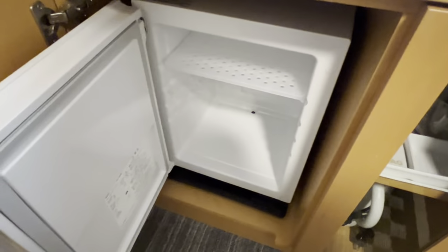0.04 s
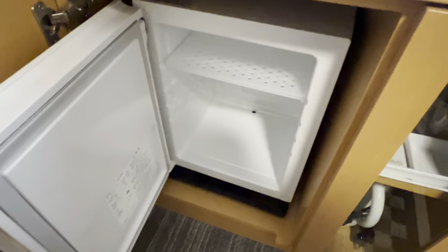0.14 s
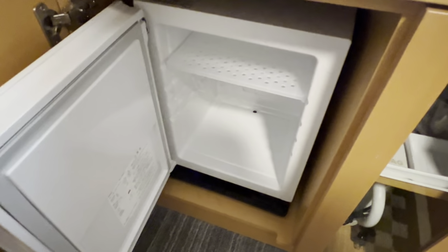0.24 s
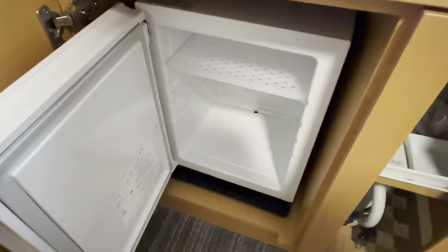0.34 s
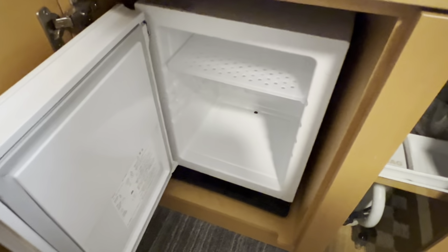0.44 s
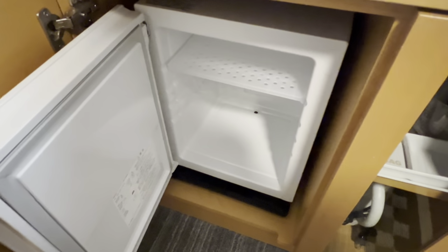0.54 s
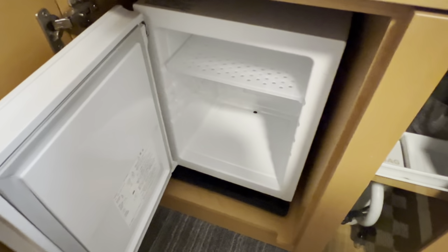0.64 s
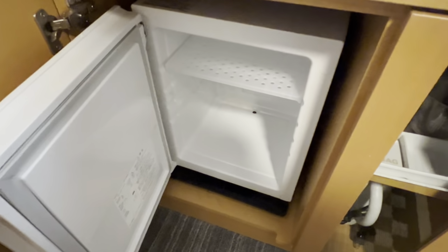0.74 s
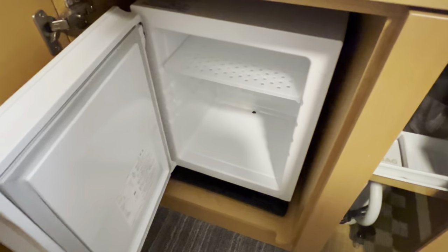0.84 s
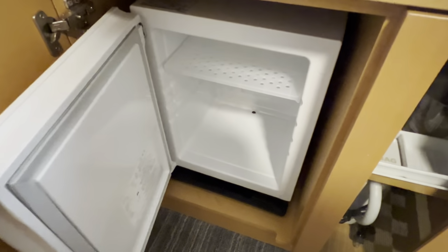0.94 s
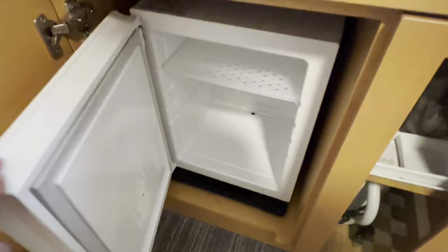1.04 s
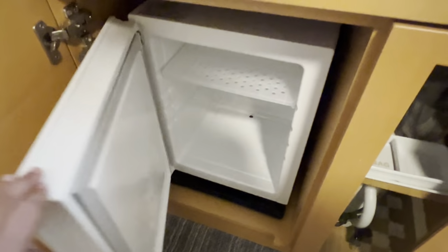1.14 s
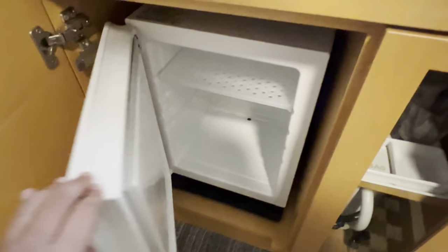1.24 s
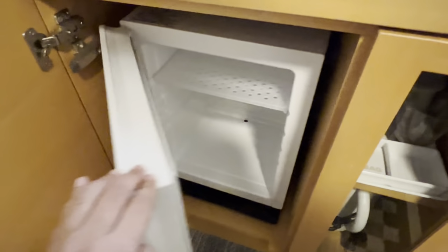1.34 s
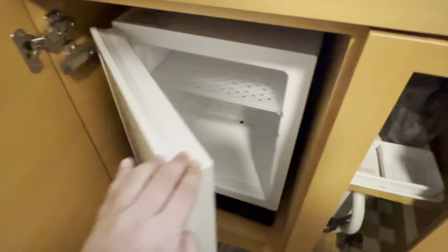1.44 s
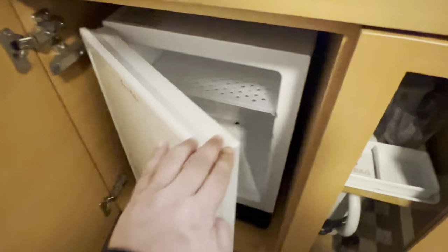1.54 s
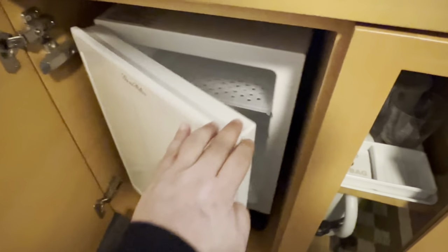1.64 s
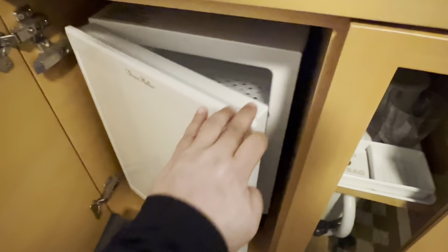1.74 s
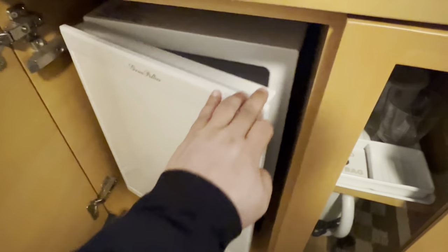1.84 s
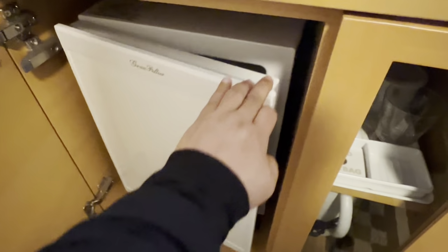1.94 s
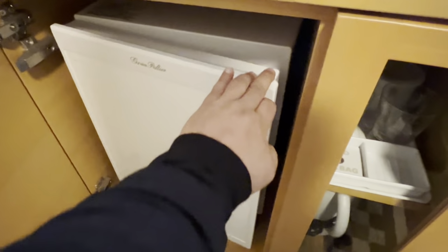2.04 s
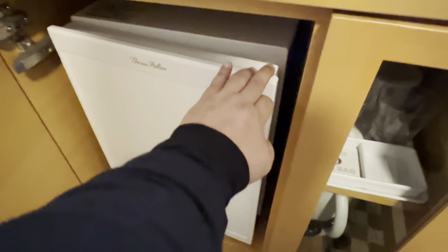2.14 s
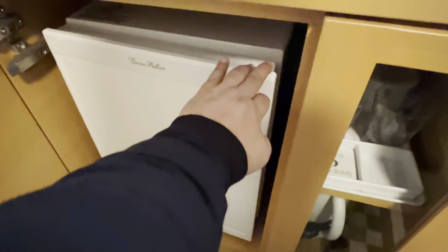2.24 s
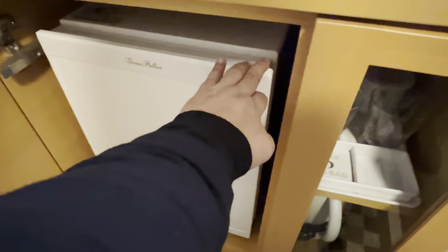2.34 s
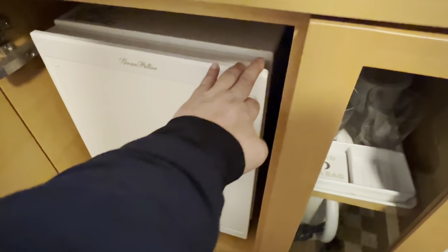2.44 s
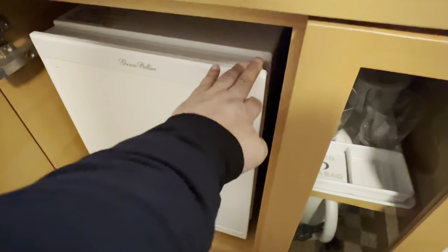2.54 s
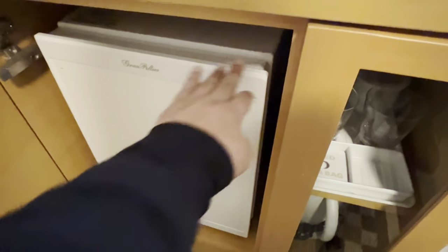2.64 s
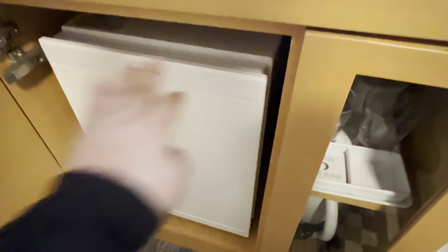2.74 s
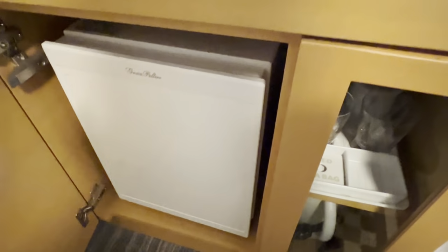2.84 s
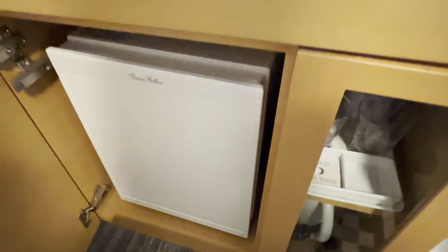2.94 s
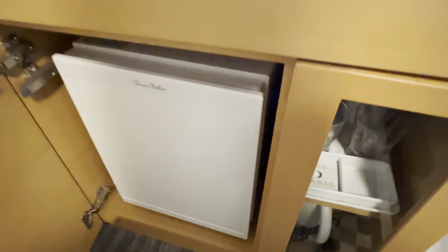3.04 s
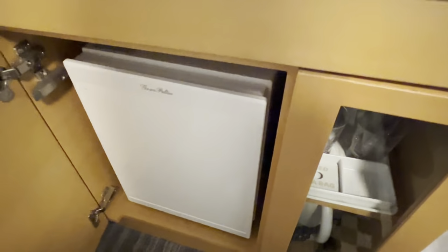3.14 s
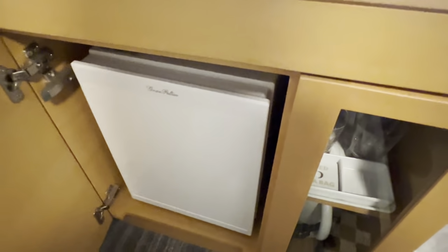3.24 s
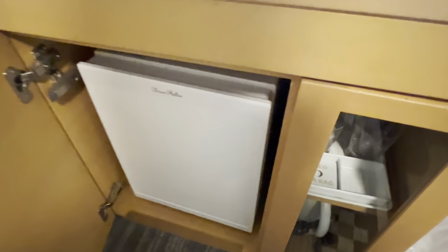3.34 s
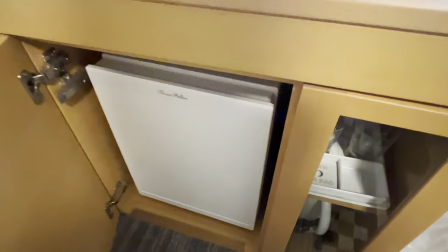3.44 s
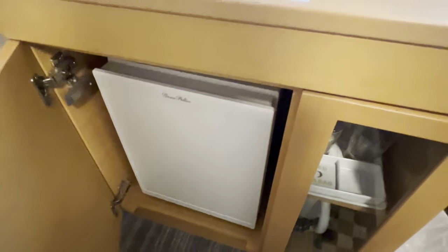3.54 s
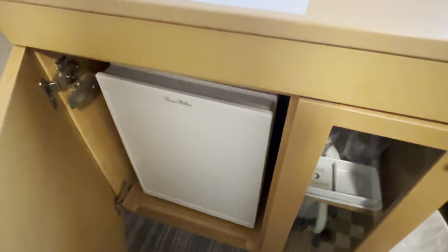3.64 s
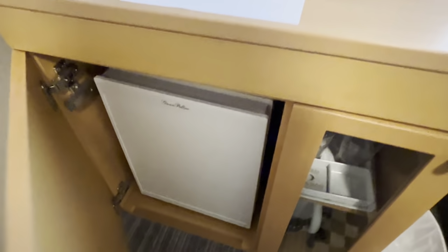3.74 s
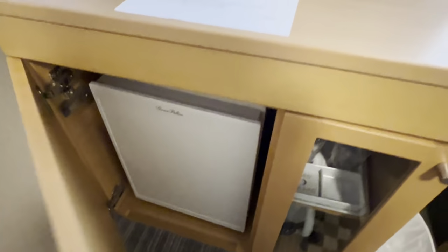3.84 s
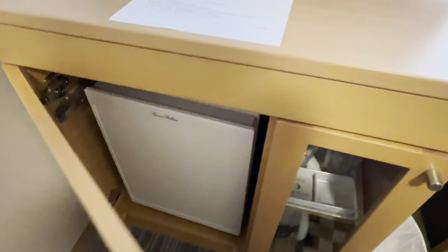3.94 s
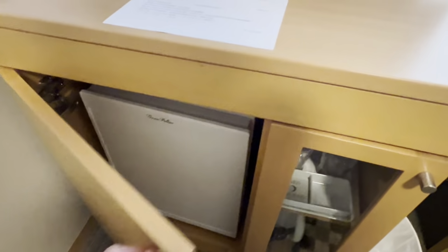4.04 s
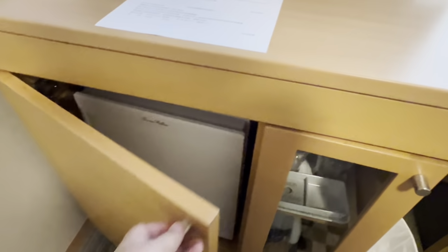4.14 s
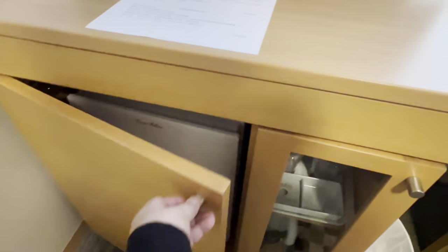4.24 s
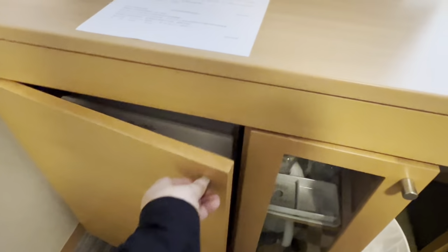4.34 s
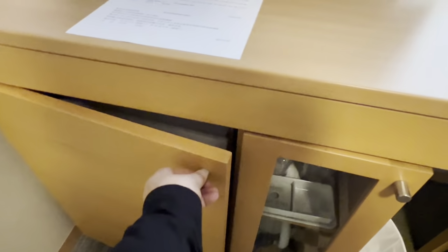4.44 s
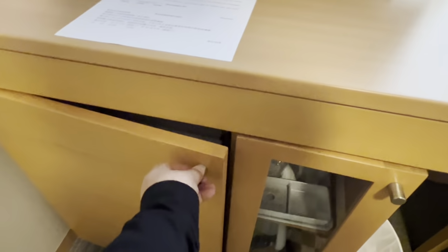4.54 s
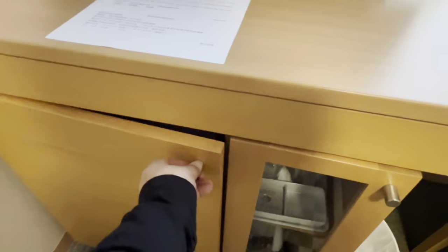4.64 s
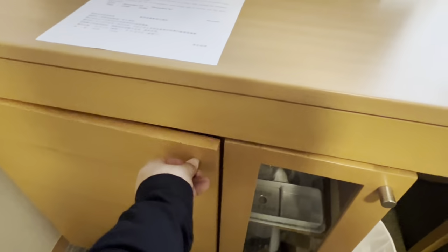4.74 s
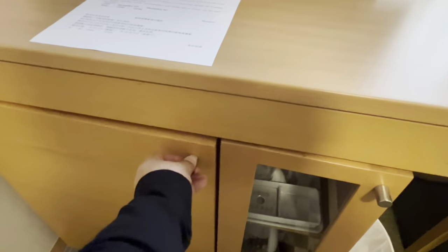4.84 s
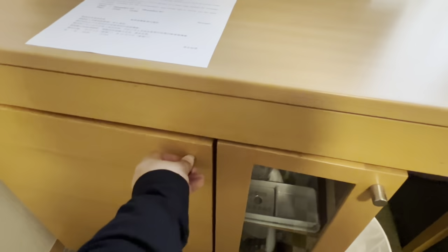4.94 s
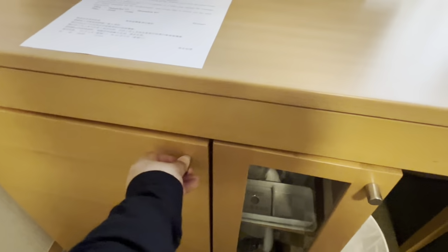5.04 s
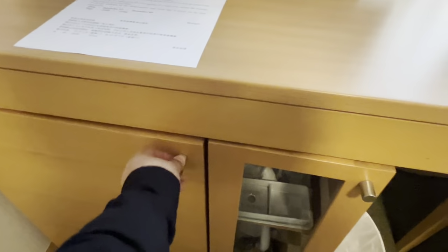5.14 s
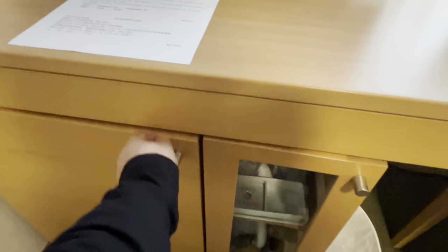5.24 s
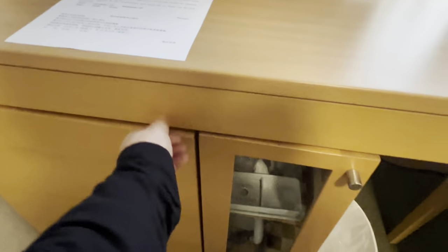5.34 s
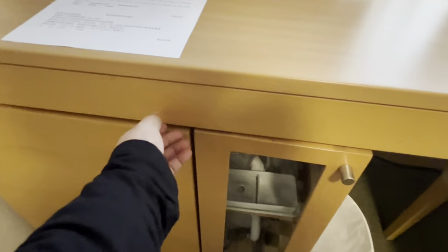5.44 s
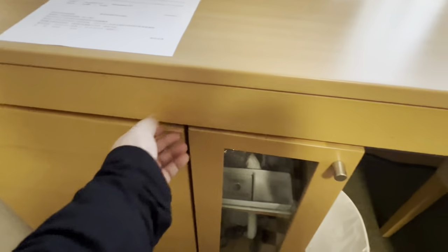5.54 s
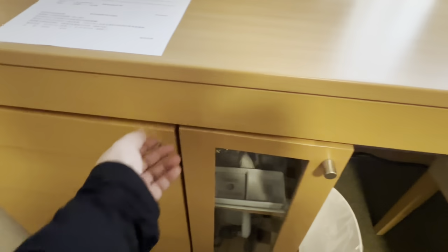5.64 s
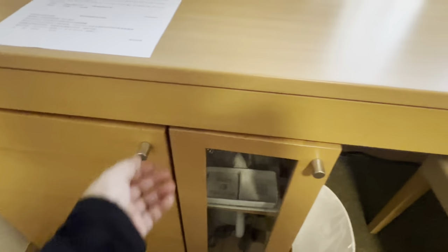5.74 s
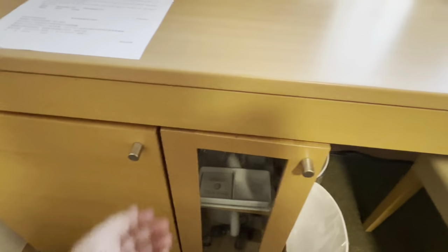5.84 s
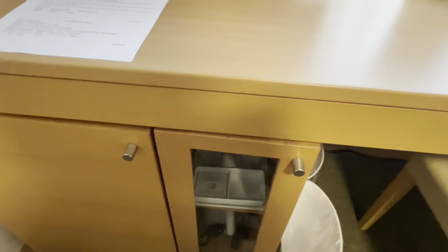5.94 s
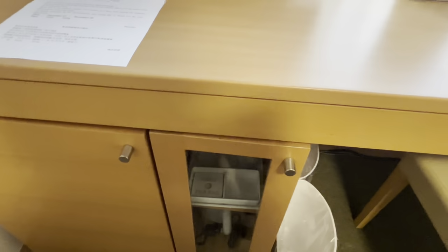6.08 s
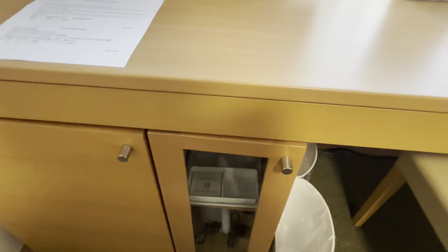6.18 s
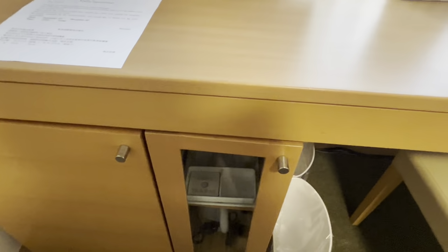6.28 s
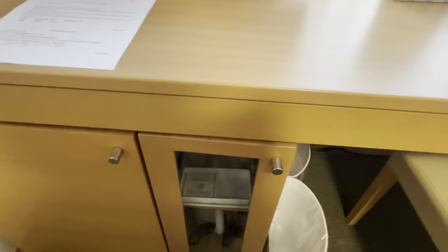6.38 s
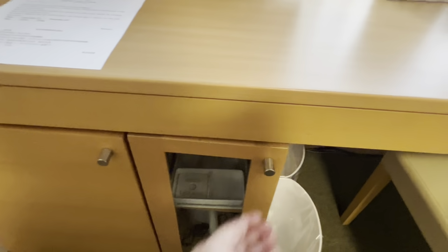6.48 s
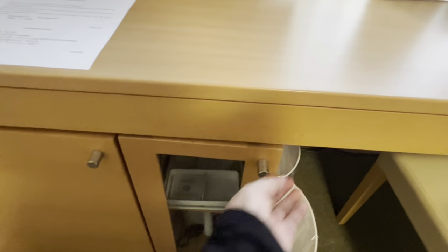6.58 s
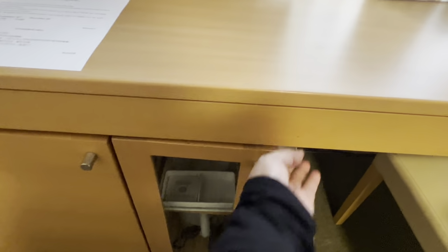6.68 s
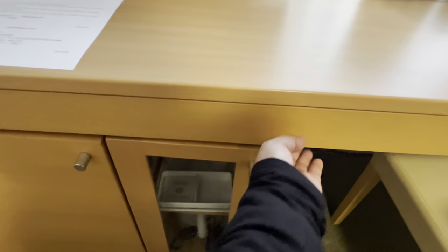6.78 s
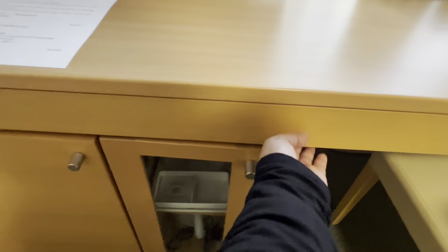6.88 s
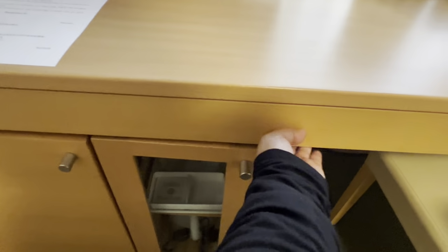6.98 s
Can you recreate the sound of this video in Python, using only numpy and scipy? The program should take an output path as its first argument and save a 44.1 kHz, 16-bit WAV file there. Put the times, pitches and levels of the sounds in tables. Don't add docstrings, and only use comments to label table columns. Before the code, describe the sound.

Low ventilation rumble and faint motor hum fill a small carpeted room. A mini fridge door lands with a deep, cushioned thud and a small rebound, followed by a tiny bright peel of a fingertip. A sleeve rustles close by, fingers tick and slide, then a wooden cabinet door bangs shut with a sharp crack and short panel ring. Handheld close stereo microphone, with light handling knocks afterwards.

```python
import sys
import numpy as np
from scipy import signal
from scipy.fft import rfft, irfft
from scipy.io import wavfile

SR = 44100
rng = np.random.default_rng(int(sys.argv[2]) if len(sys.argv) > 2 else 0)


def gain_from_db(level_db):
    decades = np.asarray(level_db, float) / 20
    return 10 ** decades


def pcm_store(signal):
    levels = np.round(np.clip(np.atleast_2d(signal), -1, 1) * 32767)
    wavfile.write(sys.argv[1], SR, levels.astype(np.int16).T)


N = 309141

# (time [s], push [dB], slap [dB], door skin [dB])
FRIDGE_TOUCHES = [
    (2.336, -23, -37, -55),
    (2.3495, -43.5, -46, -57.5),
    (2.380, -28.5, -47.5, -64),
    (2.394, -51, -49, -66),
    (2.410, -43, -62, -60.5),
]
# (time [s], blow [dB], crack [dB])
CABINET_BLOWS = [
    (4.869, -21.5, -19),
    (4.8713, -36, -12.5),
    (4.885, -37.5, -27.5),
]
EDGES = 22 * 2 ** np.arange(0, 9.8, .4)
CENTRES = np.sqrt(EDGES[1:] * EDGES[:-1])


def rms_one(x):
    return x / np.sqrt(np.mean(x ** 2) + 1e-20)


def in_time(rows):
    s, *columns = np.transpose(rows)
    return [np.interp(np.arange(N) / SR, s, c) for c in columns]


def at_hz(points, hz):
    return np.interp(np.log(hz), np.log(np.array(points)[:, 0]), np.array(points)[:, 1])


def drift(rate):
    r = np.exp(-80 * np.pi * rate / SR)
    slow = signal.lfilter([1], [1, -2 * r, r * r], rng.standard_normal(N // 40 + 2002))[2000:]
    return np.interp(np.arange(N) / 40, np.arange(len(slow)), rms_one(slow))


def resonate(x, hz, width):
    r = np.exp(-np.pi * width / SR)
    top = (1 - r * r) / 2 * np.array([1, 0, -1])
    return signal.lfilter(top, [1, -2 * r * np.cos(2 * np.pi * hz / SR), r * r], x)


def coloured(x, spectrum):
    cepstrum = irfft(np.log(gain_from_db(at_hz(spectrum, np.fft.rfftfreq(len(x), 1 / SR) + 1))))
    cepstrum[1:len(x) // 2] *= 2
    cepstrum[len(x) // 2 + 1:] = 0
    return irfft(rfft(x) * np.exp(rfft(cepstrum)), len(x))


def bands(white):
    for k, hz in enumerate(CENTRES):
        sos = signal.butter(2, EDGES[k:k + 2], "band", fs=SR, output="sos")
        yield hz, signal.sosfilt(sos, white[k % 2])


def two_ears(mid, side, alike):
    return np.sqrt(1 + alike) * mid + np.sqrt(1 - alike) * side * [[1], [-1]]


def spread_noise(spectrum, patchy_db, lift_db):
    # (frequency [Hz], left-right likeness [-1 to 1])
    likeness = [(40, 0.91), (120, 0.078), (250, 0.78), (500, 0.6), (1000, 0.12), (2000, 0.099),
                (12000, 0.12)]
    out, power = 0, 0
    for hz, (mid, side) in bands(rng.standard_normal((2, 2, N))):
        band = gain_from_db(at_hz(spectrum, hz)) * two_ears(mid, side, at_hz(likeness, hz))
        power += np.mean(band ** 2)
        out = out + band * gain_from_db(patchy_db * drift(10) + lift_db(hz))
    return out / np.sqrt(power)


def ring(s, db, hz, t60, contact_s):
    out, at = np.zeros(N), round(s * SR)
    t = np.arange(min(N - at, round(1.5 * t60 * SR))) / SR
    swell = 1 - np.exp(-(t / contact_s) ** 2)
    out[at:at + len(t)] = gain_from_db(db - 60 * t / t60) * swell * np.sin(2 * np.pi * hz * t)
    return out


def burst(s, db, spectrum, t60, rise_s, snap=0):
    size = 8192
    t = np.arange(size) / SR
    splash = rng.standard_normal(size) * gain_from_db(-60 * t / t60) * (1 - np.exp(-t / rise_s))
    splash[round(2 * rise_s * SR)] += snap
    splash = coloured(splash, spectrum)
    out, at = np.zeros(N + size), round(s * SR)
    out[at:at + size] = gain_from_db(db) * splash / np.max(np.abs(splash))
    return out[:N]


def room(x):
    # (frequency [Hz], time to fall 60 dB [s])
    room_t60 = [(60, 0.43), (300, 0.29), (1500, 0.26), (2500, 0.23), (5000, 0.3), (12000, 0.011)]
    t, tail = np.arange(SR // 2) / SR, 0
    for hz, (mid, side) in bands(rng.standard_normal((2, 2, len(t)))):
        alike = 1 / (1 + (hz / 400) ** 2)
        fade = (hz > 110) * gain_from_db(-60 * t / at_hz(room_t60, hz))
        tail = tail + fade * two_ears(mid, side, alike)
    tail = tail * np.clip((t - .003) / 0.0013, 0, 1)
    tail = tail / np.sqrt(np.sum(tail ** 2) / 2)
    return gain_from_db(-3.5) * signal.fftconvolve(x[None], tail, axes=1)[:, :N]


def placed(x, pan_db, lag_s):
    return np.array([x * gain_from_db(pan_db / 2), np.roll(x, round(lag_s * SR)) * gain_from_db(-pan_db / 2)])


def air():
    # (frequency [Hz], level [dB per Hz])
    air_colour = [(12, -48), (20, -21.5), (36, -10), (60, 3.5), (270, -14.5), (310, -12.5), (422, -36.5),
                  (527, -29.5), (574, -25), (698, -29), (759, -44), (1030, -46), (1220, -37), (6360, -44),
                  (16000, -57)]
    # (time [s], level [dB])
    gusts = [(0.0, -62.5), (0.8, -59), (1.62, -62), (2.5, -58), (2.69, -63), (4.41, -59.5), (4.71, -65.5),
             (4.9, -61.5), (7.01, -63.5)]
    hum_hz = [54, 134, 307, 380, 402, 533, 689]
    # (width [Hz], doors open [dB], after fridge door [dB], after cabinet door [dB])
    hums = [(11, -68, -64, -65.5), (7.3, -77.5, -75.5, -83), (4.7, -72.5, -78.5, -85), (9.2, -79, -79, -95),
            (3.4, -95.5, -106, -89.5), (8.5, -81, -88.5, -100), (13, -81.5, -78.5, -100)]
    t = np.arange(N) / SR
    doors_shut = np.searchsorted([FRIDGE_TOUCHES[0][0], CABINET_BLOWS[0][0]], t)
    gust = in_time(gusts)[0] - np.mean(gusts, axis=0)[1]
    duct = 0.8 * gust + np.array([-1.5, 0, -2])[doors_shut]
    lift = lambda hz: gust if hz < 150 else duct if hz < 900 else 0
    soften = signal.butter(6, 13500, fs=SR, output="sos")
    out = signal.sosfilt(soften, gain_from_db(-59) * spread_noise(air_colour, 1.0, lift))
    for hz, (width, *db) in zip(hum_hz, hums):
        mid, side = resonate(rng.standard_normal((2, N)), hz, width)
        out = out + gain_from_db(np.array(db))[doors_shut] * rms_one(mid + 0.9 * side * [[1], [-1]])
    out = np.array([out[0], np.roll(out[1], round(.0005 * SR))])
    whine = np.sin(2 * np.pi * 726.7 * t - np.array([[0], [1.2]]))
    return out + gain_from_db(-81.5 + 1.5 * drift(4.8)) * whine


def sleeve():
    # (start [s], peak [s], end [s], level [dB], brightness [dB per octave])
    strokes = [(1.05, 1.13, 1.2, -103, 8), (1.24, 1.62, 2.4, -89, -2), (1.98, 2.062, 2.5, -95.5, 6.5),
               (2.54, 2.6, 3.1, -95.5, 6), (2.678, 2.693, 2.9, -92.5, 7.5), (2.7, 2.947, 3.8, -85, 1),
               (3.09, 3.116, 3.44, -73, -5.5), (3.16, 3.308, 3.65, -74, -3.5), (3.375, 3.465, 3.5, -68, -7),
               (3.388, 3.587, 3.77, -68.5, 0.5), (3.54, 3.68, 3.76, -65.5, -7),
               (3.736, 3.79, 4.05, -77.5, -0.5), (3.834, 3.89, 4, -72, -5), (3.88, 3.99, 3.676, -80, 2),
               (3.857, 4.02, 4.25, -74.5, -5), (4.041, 4.223, 4.52, -80, -2.5),
               (5.08, 5.164, 5.47, -84, -0.5), (5.208, 5.32, 5.26, -79.5, -4), (5.6, 6.03, 6.4, -84, -1),
               (6.322, 6.466, 6.8, -88, 5.5), (6.664, 6.692, 6.9, -77, -4.5),
               (6.55, 6.853, 7.7, -88.5, 3.5), (6.898, 7.002, 8.2, -81, 0.3)]
    # (frequency [Hz], level [dB per Hz])
    cloth = [(290, -55), (500, -8), (1000, -20), (2500, -20), (4000, -21.5), (7000, -24), (10000, -24.5),
             (13000, -22.5), (16000, -28.5)]
    # (frequency [Hz], width [Hz], lift [dB])
    weave = [(1015, 140, 7), (1700, 700, 12), (2500, 100, 9.5), (3605, 350, 5.5), (4775, 400, 6.5),
             (6250, 730, 8.5), (8340, 880, 8)]
    t = np.arange(0, N + 64, 64) / SR
    bend = 0.79
    swell = np.array([np.interp(t, row[:3], [0, 1, 0]) for row in strokes]) ** (2 * bend)
    db, bright = np.transpose(strokes)[3:]

    def tint(hz):
        if hz < 2200:
            return -2 + 0.65 * bright
        return bright * np.log2(max(hz / 3500, 1))

    def lift(hz):
        power = gain_from_db(db + tint(hz)) ** 2 @ swell
        return np.interp(np.arange(N) / SR, t, 10 * np.log10(power + 1e-13))

    rub = spread_noise(cloth, 1.2, lift) * gain_from_db(2.0 * drift(150))
    rub = rub + sum((gain_from_db(lift_db) - 1) * resonate(rub, hz, width) for hz, width, lift_db in weave)
    rub = np.array([rub[0], np.roll(rub[1], round(.0003 * SR))])
    return gain_from_db(3.0) * signal.sosfilt(signal.cheby2(12, 40, 16100, fs=SR, output="sos"), rub)


def puffs():
    # (time [s], peak [dB], time to fall 60 dB [s])
    cloth_puffs = [
        (3.592, -56, 0.45),
        (3.791, -59, 0.064),
        (3.867, -53, 0.16),
        (3.98, -58.5, 0.2),
    ]
    # (frequency [Hz], level [dB per Hz])
    puff_colour = [(2000, -15), (4000, -2.5), (8000, -11), (12000, -3), (16000, -7.5)]
    return sum(np.array([burst(s, db, puff_colour, t60, 0.016) for ear in "LR"])
               for s, db, t60 in cloth_puffs)


def hinge():
    # (time [s], frequency [Hz], level [dB])
    whistle = [(4.181, 13100, -100), (4.21, 13000, -95), (4.3, 12500, -96), (4.34, 11800, -98)]
    (first_s, first_hz, _), (last_s, last_hz, _) = whistle[0], whistle[-1]
    path = [(first_s - .01, first_hz, -140), *whistle, (last_s + .01, last_hz, -140)]
    hz, db = in_time(path)
    return gain_from_db(db + 3.6 * drift(36)) * np.sin(2 * np.pi * np.cumsum(hz + 60 * drift(60)) / SR)


def slides():
    # (start [s], end [s], frequency [Hz], width [Hz], level [dB])
    sliding_bands = [(3.23, 3.486, 3520, 500, -70.5), (3.22, 3.5, 2700, 640, -73.5),
                     (3.501, 3.74, 2680, 270, -68), (3.523, 3.677, 1005, 140, -63.5),
                     (3.597, 3.639, 717, 66, -52.5), (3.5, 3.7, 6200, 460, -73),
                     (3.903, 4.206, 2440, 200, -72), (3.926, 4.109, 1530, 550, -68),
                     (3.959, 4.15, 5900, 400, -84), (1.583, 1.64, 1300, 150, -83),
                     (1.699, 1.76, 1800, 250, -85), (1.829, 1.9, 1900, 200, -84),
                     (3.7, 3.84, 790, 470, -70), (1.5, 2.01, 380, 360, -75), (3.954, 4.305, 390, 620, -69),
                     (5.851, 6.3, 1724, 540, -78.5), (5.98, 6.2, 1710, 110, -80),
                     (5.99, 6.05, 3180, 150, -85), (5.29, 5.35, 2140, 2000, -68),
                     (3.43, 3.53, 4800, 3200, -68), (6.33, 6.5, 1930, 500, -84),
                     (5.969, 6.055, 2540, 400, -82), (3.45, 3.753, 5140, 520, -71.5),
                     (5.251, 5.423, 630, 850, -72.5), (6.69, 6.83, 4560, 350, -80.5),
                     (6.672, 6.74, 3600, 180, -77), (6.72, 6.86, 3720, 160, -84),
                     (6.68, 6.74, 1310, 160, -77), (6.675, 6.72, 2630, 500, -79),
                     (6.699, 6.837, 2024, 210, -81.5)]
    out = np.zeros((2, N))
    for start, end, hz, width, db in sliding_bands:
        a, b = round(start * SR), round(end * SR)
        once = resonate(rng.standard_normal((2, N // 10)), hz, width)
        sing = resonate(once, hz, width)[:, :b - a]
        out[:, a:b] += gain_from_db(db) * rms_one(sing) * np.sqrt(np.hanning(b - a))
    return out


def ticks():
    # (time [s], peak [dB], centre [Hz], time to fall 60 dB [s], rise [s])
    small_ticks = [(3.118, -60.5, 3460, 0.14, 0.0042), (3.716, -45, 1300, 0.017, 0.0018),
                   (3.79, -50, 2950, 0.025, 0.00079), (4.042, -55, 2500, 0.01, 0.0018),
                   (4.162, -51, 1900, 0.047, 0.006), (4.175, -55, 910, 0.051, 0.0034),
                   (4.3635, -48, 1900, 0.028, 0.0037), (4.23, -58.5, 2500, .035, .004),
                   (4.664, -64.5, 1205, 0.024, .002), (4.7718, -48.5, 2940, .01, .0005),
                   (5.303, -57, 2000, 0.04, 0.01), (5.33, -61, 2180, 0.03, 0.003),
                   (5.37, -61.5, 2300, 0.042, 0.0066), (5.392, -64, 684, 0.049, .003),
                   (6.676, -68, 4200, 0.086, 0.0055), (6.99, -64.5, 3900, 0.11, 0.0046)]
    out = 0
    for s, db, hz, t60, rise in small_ticks:
        fall = 8 + 131 * t60
        hump = [(hz / 16, -4 * fall), (hz, 0), (hz * 16, -6 * fall)]
        out = out + burst(s, db, hump, t60, rise, 0.0074 / rise)
    return out


def knob():
    # (time [s], peak [dB])
    touches = [
        (4.354, -65),
        (4.3635, -49.5),
        (4.3685, -50),
        (4.388, -60),
        (4.41, -65.5),
    ]
    # (frequency [Hz], level [dB], time to fall 60 dB [s])
    knob_modes = [(1004, -4.5, 0.046), (1390, -1.5, .08), (1447, -2.5, 0.1), (1660, -4.5, 0.07),
                  (1693, 0.5, 0.09), (2070, 3, 0.035), (2460, -7, 0.043), (2800, -15, .05),
                  (3950, -13.5, 0.022)]
    luck = rng.normal(0, 2.9, (len(touches), len(knob_modes)))
    return sum(ring(s, db + rel_db + own, hz, t60, 0.0013)
               for (s, db), row in zip(touches, luck)
               for (hz, rel_db, t60), own in zip(knob_modes, row))


def peel():
    # (time [s], peak [dB])
    peels = [(2.6888, -33.5)]
    # (frequency [Hz], level [dB per Hz])
    peel_colour = [(1200, -52), (2400, -20), (3700, -6.5), (5500, -12), (8000, -15), (10500, -12),
                   (12000, 3.5), (14000, 8), (16500, -16.5)]
    return sum(burst(s, db, peel_colour, 0.0033, 0.00027, 9.7) for s, db in peels)


def handling():
    # (time [s], peak [dB], lowest mode [Hz], time to fall 60 dB [s])
    knocks = [(3.124, -38.5, 330, 0.057), (3.141, -38.5, 110, 0.15), (4.186, -51, 193, 0.16),
              (4.178, -46.5, 312, 0.13), (4.195, -41.5, 82, 0.25), (4.232, -43.5, 80, 0.22),
              (4.183, -52, 420, 0.094), (3.8, -52, 200, .12), (4.383, -44.5, 482, 0.062),
              (4, -47.5, 356, .08), (4.39, -55, 208.4, .12), (4.406, -39, 84, 0.16), (4.9, -45.5, 88, 0.24),
              (6.6895, -30, 91.6, 0.11), (6.705, -43.5, 73.8, 0.27)]
    # (ratio to the lowest, level [dB])
    panel = [(1, 2), (1.27, -8), (1.6, -13.5), (2.3, -11), (3.402, -15.5)]
    return sum(ring(s, db + rel_db, ratio * hz, t60 / ratio, 0.004)
               for s, db, hz, t60 in knocks for ratio, rel_db in panel)


def fridge():
    # (frequency [Hz], level [dB], time to fall 60 dB [s])
    cavity = [(50, 0, 0.37), (79.65, 1, 0.48), (99, -27, 0.14), (128, -26, 0.18), (157, -17.5, 0.056),
              (197.6, -7.5, 0.055), (327, -20, 0.11), (368.3, -25, 0.2), (470, -30, 0.14), (640, -33, 0.16)]
    # (frequency [Hz], level [dB], time to fall 60 dB [s])
    skin_modes = [(628, -6.5, 0.24), (687, -4, 0.18), (782.3, 0.5, 0.28), (838, -4, .25), (910, -11, .2),
                  (1130, -13, .2), (1279, -4, 0.15), (1484, -10, .2), (1600, -6, .1), (1690, -16, .2),
                  (1770, -9, 0.16), (2080, -10, 0.055)]
    # (frequency [Hz], level [dB per Hz])
    slap_colour = [(100, -38), (300, -22), (600, -6), (1000, -11), (1900, -4.5), (2600, -11.5),
                   (4000, -15.5), (5000, -28), (8000, -23.5), (10000, -29), (13000, -21), (16000, -33)]
    first_s = FRIDGE_TOUCHES[0][0]
    boom = -ring(first_s + 0.0055, -24, 70, 0.054, 0.0026)
    slaps = burst(first_s - .012, -56, [(1200, -14), (3200, -7), (9000, -29.0)], 0.1, 0.007)
    for s, push, slap, skin_db in FRIDGE_TOUCHES:
        boom = boom + sum(ring(s + 0.01243, push + db, hz, t60, 0.0025) for hz, db, t60 in cavity)
        boom = boom + sum(ring(s + 0.00298, skin_db + db, hz, t60, .0036) for hz, db, t60 in skin_modes)
        slaps = slaps + burst(s, slap, slap_colour, 0.037, 0.007, .4)
    return boom, slaps


def cabinet():
    # (frequency [Hz], level [dB], time to fall 60 dB [s])
    wood = [(85, -0.5, 0.35), (105.7, -8, 0.37), (122, -8.5, 0.31), (160, -12.5, 0.47), (190, -15.5, 0.27),
            (234.4, -20, 0.57), (322.6, -13.5, .25), (346.6, -11, 0.3), (387.8, -4.5, 0.16),
            (415.6, -16, .2), (474, -14.5, 0.21), (574, -11, 0.1), (650.5, -11, .12), (740, -13, .15),
            (833, -10, 0.27), (959, -12, 0.3), (975, -13, .2), (1114, -8.5, .15), (1175, -11.5, 0.2),
            (1294, -8, 0.4), (1424, -11, .3), (1515, -6, 0.4), (1598, -7, 0.37), (1610, -10.5, 0.37),
            (1680, -6, .25), (2103, -9, 0.13), (2277, -22, .2), (2553, -15, 0.2), (2780, -15, 0.17)]
    # (frequency [Hz], level [dB per Hz])
    crack_colour = [(100, -31), (300, -14.5), (600, -18), (900, -8), (1200, -1), (1550, -4.5), (2100, -7.5),
                    (2850, -6), (3150, -19), (4200, -23), (5600, -34), (8000, -44.5), (11000, -66),
                    (16000, -82.5)]
    # (time [s], crack [dB])
    chatter = [(4.8756, -26), (4.878, -30), (4.883, -32), (4.891, -36.5)]

    def struck(modes):
        return -sum(ring(s + 0.38 / hz, blow + db, hz, t60 / (1 + hz / 1500), 1.4 / hz)
                    for s, blow, _ in CABINET_BLOWS for hz, db, t60 in modes)

    cracks = burst(CABINET_BLOWS[0][0] - .01, -41.5, crack_colour, 0.23, .008)
    for s, db in [(s, crack) for s, _, crack in CABINET_BLOWS] + list(chatter):
        cracks = cracks + burst(s, db, crack_colour, 0.01, .0008, 3.0)
    return struck(wood[:17]), struck(wood[17:]), cracks


def scene():
    boom, slap = fridge()
    lows, highs, crack = cabinet()
    small, knocks, snap = ticks() + knob(), handling(), peel()
    direct = placed(boom + slap, -1.3, 0.00019) + placed(snap, -1.2, 0)
    direct = direct + placed(lows, .3, .0002) + placed(highs, .4, 0.00041) + placed(crack, .3, .00045)
    direct = direct + placed(small + knocks, .4, 0.00028)
    to_room = gain_from_db(-4) * (slap + crack) + gain_from_db(-6) * (boom + lows + knocks)
    to_room = to_room + gain_from_db(-9) * highs + gain_from_db(-4.5) * small + gain_from_db(-5.5) * snap
    return direct + room(to_room) + hinge() + sleeve() + slides() + puffs() + air()


def top_cut(x):
    return signal.sosfilt(signal.butter(12, 16510, fs=SR, output="sos"), x)


def record(dry):
    # (frequency [Hz], width [Hz], depth [0-1])
    port_notches = [(7630, 270, 1), (10770, 1400, 0.6)]
    out = signal.sosfilt(signal.butter(3, 34, "high", fs=SR, output="sos"), dry)
    out = signal.sosfilt(signal.cheby2(10, 50, 17000, fs=SR, output="sos"), out)
    for hz, width, depth in port_notches:
        out = out - depth * resonate(out, hz, width)
    return top_cut(out)


dry = scene()
out = record(dry)
pcm_store(out)
```